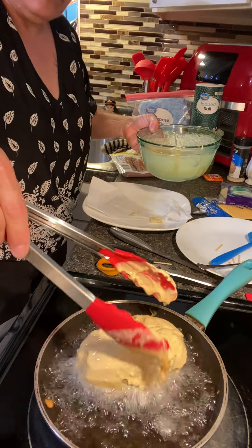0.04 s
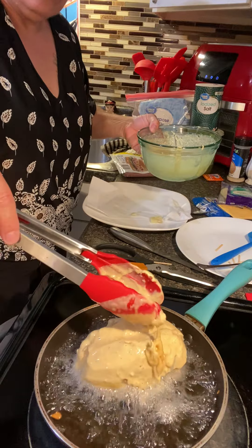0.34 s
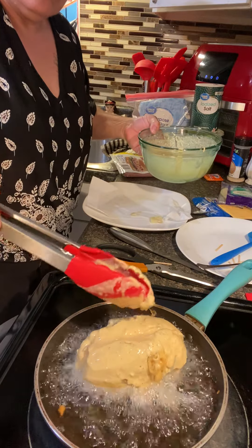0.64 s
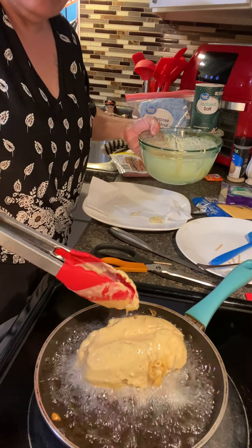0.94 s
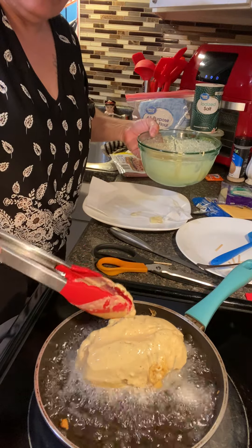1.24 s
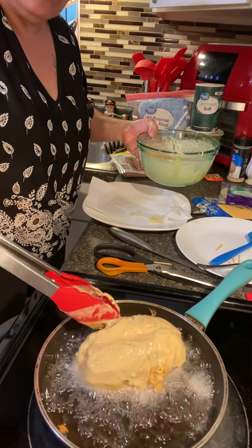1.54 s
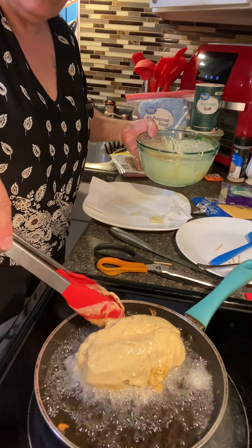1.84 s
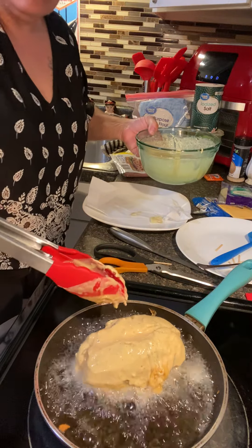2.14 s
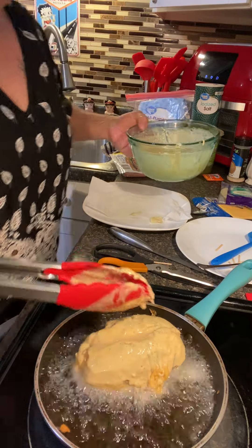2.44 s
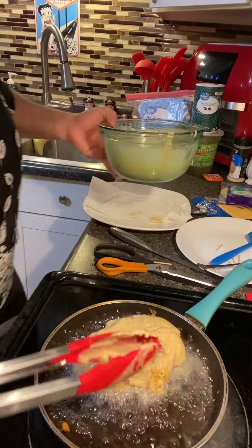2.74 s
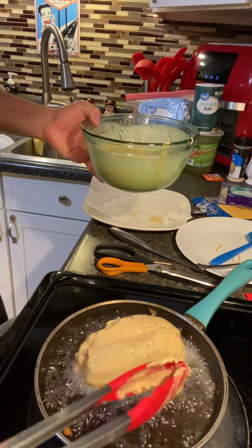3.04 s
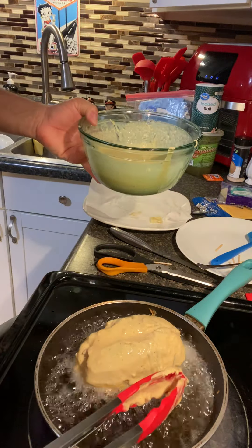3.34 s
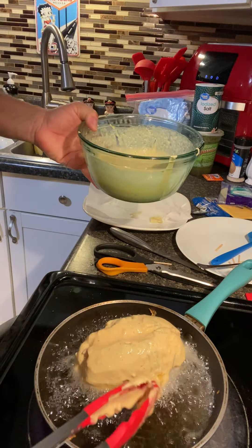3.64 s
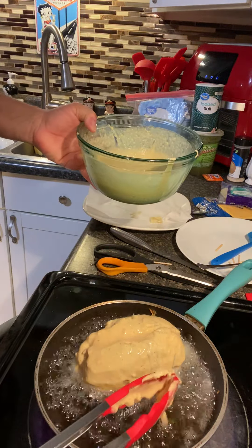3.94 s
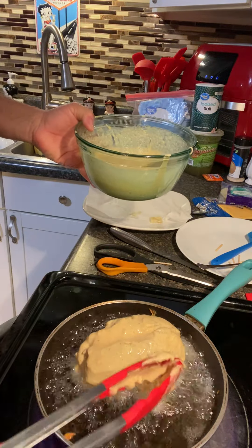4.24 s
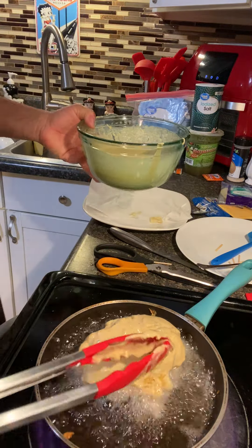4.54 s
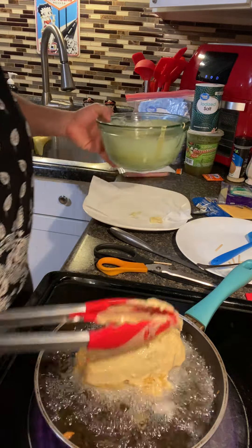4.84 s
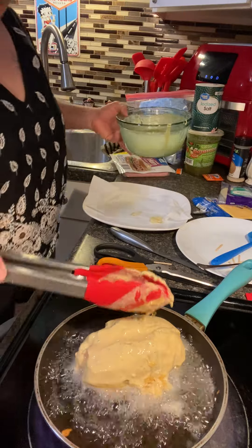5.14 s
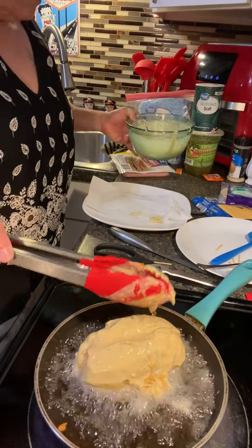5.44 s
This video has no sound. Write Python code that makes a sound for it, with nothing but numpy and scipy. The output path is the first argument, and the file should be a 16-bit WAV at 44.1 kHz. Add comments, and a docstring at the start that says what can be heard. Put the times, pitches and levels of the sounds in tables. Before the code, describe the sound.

Hot oil sizzles steadily in a frying pan, with small sharp pops and a brief flurry of spitting.

```python
"""Battered potato frying

A shallow pan of oil, an arm's length away in a small kitchen. Countless tiny steam bubbles make a
soft sizzle, and water drops from the batter burst as short, bright pings. The crust spits and
whistles thinly. Tongs give a few dull knocks, and the sizzle changes colour as they reach over it."""
import sys
import numpy as np
from scipy import signal
from scipy.fft import rfft, irfft
from scipy.io import wavfile
from scipy.ndimage import uniform_filter1d

SR = 44100
rng = np.random.default_rng(int(sys.argv[2]) if len(sys.argv) > 2 else 0)


def generate_wav(sig):
    """Save sig (samples, or channels by samples) to the path in sys.argv[1] as 16-bit PCM at SR."""
    pcm = np.round(np.clip(np.atleast_2d(sig).T, -1, 1) * 32767).astype(np.int16)
    wavfile.write(sys.argv[1], SR, pcm)


N = 246959
TIME = np.arange(N) / SR


# The ride of the boil. Each row: time in seconds, vigour in dB, mist level in dB before its trim.
BOIL_CURVE = [(0.0, -56, -66), (0.28, -57, -66.5), (1.11, -59, -66), (1.29, -57, -65.5), (1.7, -59, -70),
              (2.03, -58, -64.5), (2.2, -59, -71), (2.45, -59, -71), (2.71, -58, -70), (2.89, -53, -67),
              (3.54, -56, -69), (4.04, -54, -63), (4.55, -54, -67), (4.8, -58, -68), (5.21, -60, -71.5),
              (5.41, -60, -67), (5.6, -58, -71)]
CALM_BOIL_DB, MIST_TRIM_DB = -57.5, 1

def sizzle(simmer_top_hz=1860, froth_top_hz=4410, spray_top_hz=10760):
    """Large bubbles simmer, froth hisses round the crust, and fine spray and mist crackle on top."""
    times, _, mist_curve_db = np.transpose(BOIL_CURVE)
    simmer_db = boil_level(base_db=-62, follow=0.12, settle_db_per_s=0.23, tongs_db=-0.84)
    simmer_db += 2.5 * np.exp(-((TIME - 4.7) / 0.31) ** 2)  # the low bubbling swells briefly
    froth_db = boil_level(base_db=-61.5, follow=0.43, settle_db_per_s=0.5, tongs_db=3.5)
    spray_db = boil_level(base_db=-59, follow=0.76, settle_db_per_s=0.04, tongs_db=1.1)
    mist_db = np.interp(TIME, times, mist_curve_db) + MIST_TRIM_DB
    simmer = bubble_band(20, simmer_top_hz, simmer_db, crackle_db=-8, flicker_db=1)
    froth = bubble_band(simmer_top_hz, froth_top_hz, froth_db, crackle_db=-1.5, flicker_db=1.32)
    spray = bubble_band(froth_top_hz, spray_top_hz, spray_db, crackle_db=1.5, flicker_db=2)
    mist = bubble_band(spray_top_hz, 12800, mist_db, crackle_db=3.5, flicker_db=1.7)
    return simmer + froth + spray + mist


def vigour_db():
    """How far the boil stands above a calm one."""
    times, boil_db, _ = np.transpose(BOIL_CURVE)
    return np.interp(TIME, times, boil_db) - CALM_BOIL_DB


def boil_level(base_db, follow, settle_db_per_s, tongs_db):
    """A layer's dB ride: it follows the boil, sinks as the batter dries, shifts under dripping tongs."""
    return base_db + follow * vigour_db() - settle_db_per_s * TIME + tongs_db * tongs_over()


# Sizzle EQ, with the pan open and under the tongs. Each row: frequency in Hz, relative gain in dB.
OPEN_PAN_EQ = [(240, -1.5), (330, 1), (560, -1.5), (880, 3.5), (1200, -3.5), (1650, 1), (2400, 2),
               (2850, -2), (5000, 7), (7700, 2), (8400, 0.5), (9400, -2.5), (10500, -17.5), (12900, -9.5)]
UNDER_TONGS_EQ = [(240, -0.5), (330, -0.5), (750, -3.5), (1900, -2), (2300, 4), (3200, 6), (4000, 0.5),
                  (5600, 5.5), (6400, 2.5), (7500, 6), (8600, 0.5), (9400, 0), (10500, -9.5), (13100, 1.5)]

def bubble_band(lo_hz, hi_hz, db, crackle_db, flicker_db):
    """Bubbles of one size: a merged hiss with single ticks standing out, both flickering."""
    ticks = crackle(per_s=2200, spread_db=4, cap_db=22)
    ticks = unit(ticks + undb(-2) * kitchen(ticks)[:N])
    bubbles = rng.standard_normal(N) + undb(crackle_db) * ticks
    open_pan = unit(band(colour(bubbles, OPEN_PAN_EQ), lo_hz, hi_hz))
    covered = unit(band(colour(bubbles, UNDER_TONGS_EQ), lo_hz, hi_hz))
    reach = tongs_over()
    crossfade = (1 - reach) * open_pan + reach * covered
    return crossfade * undb(db + flicker_db * flicker(per_s=90))


def crackle(per_s, spread_db, cap_db):
    """Tiny bubbles burst at random, most faint and a few strong."""
    hits = rng.random(N) < per_s / SR
    size_db = np.minimum(spread_db * rng.exponential(size=N), cap_db)
    return unit(hits * undb(size_db) * rng.choice([-1, 1], N))


# The move of the tongs. Each row: time in seconds, reach over the pan from 0 to 1.
TONGS_REACH = [(2.5, 0.43), (2.9, 1), (4.75, 1), (5.1, 0.56)]

def tongs_over():
    """How far the tongs reach over the pan at each moment."""
    return np.interp(TIME, *np.transpose(TONGS_REACH))


# Bursting drops, plus the loudest oil snaps as the short rows at 10 kHz and above; those screened by the crust
# are mostly echo. Each row: time of the peak in seconds, level in dB, pitch in Hz, swell in ms, room send in
# dB.
DROP_PINGS = [(.2623, -32.5, 6050, .6, -2), (.5492, -37.5, 5600, .41, -7), (.8598, -36, 10000, 0.13, -10),
              (1.0962, -34, 7220, 1, 4.5), (1.1246, -35, 10500, .12, -2), (1.1265, -38.5, 3950, .9, -1),
              (1.138, -34, 7400, 0.84, 4.5), (1.146, -37.5, 7400, 1.44, 7.5),
              (1.1623, -28, 3930, 2.6, -4.5), (1.196, -30, 5060, 1.35, 4), (1.2852, -31.5, 5150, 1, -5),
              (1.6876, -35.5, 5304, .6, -3), (2.032, -20.5, 6920, 0.74, -3), (2.392, -38, 10700, .12, -1),
              (2.393, -31.5, 6750, 0.85, 4), (2.4772, -32.5, 6430, .3, -3),
              (2.5935, -31.5, 6650, 0.15, -13), (2.6099, -32, 8300, .3, -9), (2.698, -38, 7960, .6, 6),
              (2.705, -34.5, 7500, 1.1, 4), (2.726, -33, 10500, 0.15, 3), (2.7638, -21, 6090, 1.1, -6.5),
              (2.7943, -33, 3160, 0.67, -15), (2.805, -32, 9100, .5, -5), (2.9175, -30.5, 3339, .6, -8),
              (2.9943, -16.5, 5560, 0.95, -5.5), (3.0909, -35, 10800, .12, -8),
              (3.186, -29, 5117, .14, -10), (3.197, -35, 6640, .6, 0), (3.217, -24, 7530, 0.68, -9),
              (3.2366, -21.5, 7220, .4, -6), (3.24, -25, 6070, .5, -8), (3.3039, -33, 9000, .32, 0.5),
              (3.4506, -31, 7300, .18, -1), (3.5057, -26.5, 6400, .3, -1), (3.7677, -27.5, 5970, 0.16, 1.5),
              (3.853, -29, 7400, 0.17, -3), (3.9113, -31.5, 6400, 0.34, 6), (3.9284, -27.5, 5580, .7, 1),
              (3.9456, -25, 7840, 0.45, 3), (3.952, -30, 9200, .5, 7.5), (3.9559, -8.5, 6700, 0.4, -3.5),
              (3.9568, -18.5, 5170, 1, -5), (3.9587, -11, 7260, .75, -22), (3.9829, -9.5, 7500, 0.51, -6.5),
              (3.9852, -20, 5200, .8, -14), (3.9867, -15, 6950, .5, -20), (4.1935, -30.5, 7060, .26, -5),
              (4.3155, -32, 6987, .4, -3), (4.5003, -11.5, 7340, .52, -5.5), (4.5658, -27, 6900, 0.19, 1),
              (4.57, -28.5, 7700, 0.97, -8), (4.5942, -32, 6850, 1.04, 1), (4.7095, -26.5, 7400, .25, -8),
              (4.823, -31, 6300, .14, -8), (4.8987, -21.5, 7800, 0.52, -4.5), (5.0756, -30, 4930, 0.17, 3),
              (5.378, -32, 6600, 0.36, 2.5), (5.3935, -34.5, 9100, 0.4, 4.5), (5.4874, -38, 4770, 1, 3)]

def drop_pings():
    """Water drops flash to steam and the loudest oil films snap; each ping sets the room ringing briefly at its
    own pitch."""
    out = np.zeros(N)
    for peak_s, db, hz, swell_ms, room_db in DROP_PINGS:
        ping = undb(db) * burst(hz, swell_ms)
        start = peak_s - swell_ms / 1000
        add(out, start, ping)
        add(out, start, undb(room_db) * kitchen(ping))
    return band(out, 1900, 16000)


def burst(hz, swell_ms):
    """A steam cavity opens and rings for a few cycles: the tone swells and quickly dies."""
    swell_s = swell_ms / 1000
    t = TIME[:int(8 * swell_s * SR) + 2]
    envelope = (t / swell_s * np.exp(1 - t / swell_s)) ** 4
    return envelope * np.sin(2 * np.pi * hz * t)


# The ring of a blister in the crust. Each row: resonance in Hz, gain in dB before the tilt.
BLISTER_MODES = [(2950, -6.5), (4550, -3), (6000, -3), (7450, -3), (9350, -13.5)]
# Its volleys. Each row: first puff in seconds, length in seconds, first and last puff's drive in dB.
SPIT_VOLLEYS = [(2.73, .0425, -31, -34), (2.8258, .017, -42, -29)]
FRESH_DB_PER_OCTAVE, SPENT_DB_PER_OCTAVE = 15.5, 5

def crust_spits(puff_gap_s=0.0072, swell_ms=0.85, room_db=-4):
    """A blister vents in quick, even puffs; each rings the same cavity, duller as the steam is spent."""
    out = np.zeros(N)
    for first_s, length_s, first_db, last_db in SPIT_VOLLEYS:
        count = round(length_s / puff_gap_s) + 1
        fresh = (first_s, first_db, FRESH_DB_PER_OCTAVE)
        spent = (first_s + length_s, last_db, SPENT_DB_PER_OCTAVE)
        for peak_s, db, tilt in np.linspace(fresh, spent, count):
            puff = sum(undb(db + mode_db + tilt * np.log2(hz / 6000)) * burst(hz, swell_ms)
                       for hz, mode_db in BLISTER_MODES)
            start = peak_s - swell_ms / 1000
            add(out, start, puff)
            add(out, start, undb(room_db) * kitchen(puff))
    return out


def small_pops(count, mean_db, spread_db, centre_hz, swell_ms, room_db=-11.5):
    """Faint bubbles of random size burst all over the pan."""
    out = np.zeros(N)
    for peak_s, (size, pitch, length) in zip(burst_times(count), rng.standard_normal((count, 3))):
        hz = min(centre_hz * np.exp(0.3 * pitch), 0.4 * SR)
        pop = burst(hz, swell_ms * np.exp(0.5 * length))
        add(out, peak_s, undb(mean_db + spread_db * np.tanh(size)) * pop)
    return out + undb(room_db) * kitchen(out)[:N]


def oil_snaps(count=26, mean_db=-41, spread_db=5, swell_ms=0.16, room_db=-4):
    """Thin films of oil break: sharp ticks at the top of the treble."""
    out = np.zeros(N)
    starts = burst_times(count)
    levels_db = mean_db + spread_db * rng.uniform(-0.88, 1, count)
    for start, db, hz in zip(starts, levels_db, rng.uniform(10500, 11000, count)):
        add(out, start, undb(db) * burst(hz, swell_ms))
    return out + undb(room_db) * kitchen(out)[:N]


def burst_times(count, follow=1.8):
    """Random moments, crowding where the oil boils hardest."""
    due = np.cumsum(undb(follow * vigour_db()))
    return np.interp(rng.random(count), due / due[-1], TIME)


# Thin whistles from the crust.
# Each row: midpoint in seconds, length in seconds, pitch in Hz, bandwidth in Hz, level in dB.
STEAM_JETS = [(2.745, .16, 3050, 327, -52), (2.831, 0.024, 2820, 300, -46.5),
              (2.925, 0.06, 3040, 300, -51.5), (2.979, 0.057, 2920, 170, -53),
              (3.074, 0.056, 13100, 1080, -54), (3.303, 0.027, 3150, 250, -55),
              (4.338, 0.194, 1133, 90, -63), (4.655, .15, 1280, 70, -63)]

def steam_whistles():
    """Steam escapes through pores in the batter as narrow, unsteady whistles."""
    out = np.zeros(N)
    for middle_s, length_s, hz, width_hz, db in STEAM_JETS:
        position = 2 * (TIME - middle_s) / length_s - 1
        arch = np.sqrt(np.maximum(1 - position ** 2, 0))
        pore = signal.butter(2, [hz - width_hz / 2, hz + width_hz / 2], "bandpass", fs=SR, output="sos")
        out += undb(db) * arch * unit(signal.sosfilt(pore, rng.standard_normal(N)))
    return out


# Tongs and bowl. Each row: start in seconds, level in dB, pitch in Hz, seconds to fade by 60 dB.
KNOCK_TONES = [(3.248, -54.5, 560, 0.12), (3.288, -54, 455, 0.082), (4.166, -57.5, 1114, 0.11),
               (4.345, -50.5, 660, .05), (4.965, -57, 363, 0.16), (5.031, -42.5, 1595, 0.046),
               (5.032, -48.5, 767, 0.11), (5.044, -50.5, 1453, 0.095), (5.099, -56.5, 385, 0.16)]

def utensil_knocks(contact_s=0.00092, room_db=-5):
    """Soft, dull knocks; each row is one damped tone, and three together form the loudest knock."""
    out, t = np.zeros(N), TIME[:SR // 4]
    for start, db, hz, t60 in KNOCK_TONES:
        envelope = (1 - np.exp(-t / contact_s)) * np.exp(-np.log(1000) * t / t60)
        add(out, start, undb(db) * envelope * np.sin(2 * np.pi * hz * t))
    return out + undb(room_db) * kitchen(out)[:N]


def kitchen(x, t60_s=0.096, predelay_s=0.0013, first_echoes_per_s=1500, build_s=0.025):
    """Uneven reflections from pan, hob and walls, with the same energy as the direct sound."""
    t = TIME[:SR // 5]
    echoes_per_s = first_echoes_per_s * (1 + t / build_s) ** 2  # sparse at first, then dense
    arrives = rng.random(len(t)) < echoes_per_s / SR
    decay = np.exp(-np.log(1000) * t / t60_s) * (t > predelay_s)
    wet = signal.fftconvolve(x, arrives * rng.standard_normal(len(t)) * decay)
    return wet * np.sqrt(np.sum(x ** 2) / np.sum(wet ** 2))


def flicker(per_s):
    """Glides between random levels, at rms 1."""
    hold = int(SR / per_s)
    steps = np.repeat(rng.standard_normal(N // hold + 1), hold)
    return unit(uniform_filter1d(steps, hold)[:N])


def band(x, lo_hz, hi_hz):
    """Keep one band, with steep, smooth skirts."""
    f = np.arange(N // 2 + 1) * SR / N + 1e-3
    return irfft(rfft(x) / np.sqrt((1 + (lo_hz / f) ** 20) * (1 + (f / hi_hz) ** 20)), N)


def colour(x, points):
    """EQ a sound through (Hz, dB) points."""
    hz, db = np.transpose(points)
    f = np.arange(N // 2 + 1) * SR / N + 1
    return irfft(rfft(x) * undb(np.interp(np.log(f), np.log(hz), db)), N)


def undb(db):
    """Decibels to gain."""
    return 10 ** (np.asarray(db) / 20)


def unit(x):
    """Scale to rms 1."""
    return x / np.sqrt(np.mean(x ** 2))


def add(out, start_s, x):
    """Drop a short sound into the mix."""
    i = max(int(start_s * SR), 0)
    out[i:i + len(x)] += x[:N - i]


def scene():
    """The mono mix: a bed of sizzle and small pops, with pings, spits, whistles and knocks on top."""
    faint = small_pops(count=170, mean_db=-47, spread_db=0.5, centre_hz=5880, swell_ms=0.43)
    prickle = small_pops(count=200, mean_db=-50.5, spread_db=5, centre_hz=11800, swell_ms=0.13)
    plops = small_pops(count=160, mean_db=-62.5, spread_db=3, centre_hz=1300, swell_ms=2.55)
    ticks = small_pops(count=30, mean_db=-42, spread_db=7, centre_hz=5000, swell_ms=0.15)
    bed = sizzle() + faint + prickle + plops + ticks + oil_snaps()
    return (bed + drop_pings() + crust_spits() + steam_whistles() + utensil_knocks())[None]


def record(dry):
    """A steep low cut leaves very faint bass, and the top is cut off."""
    low_cut_hz, high_cut_hz, bass_floor_db = 234.7, 14200, -31.5
    low_cut = signal.butter(10, low_cut_hz, "highpass", fs=SR, output="sos")
    high_cut = signal.ellip(8, 0.2, 70, high_cut_hz, fs=SR, output="sos")
    thin = signal.sosfilt(low_cut, dry) + undb(bass_floor_db) * dry
    return signal.sosfilt(high_cut, thin)


dry = scene()
out = record(dry)
generate_wav(out)
```